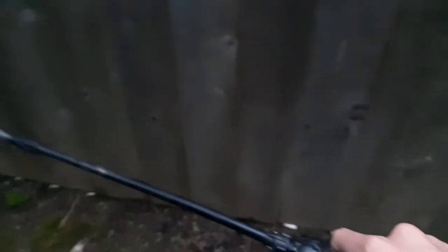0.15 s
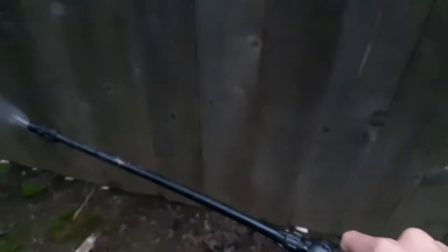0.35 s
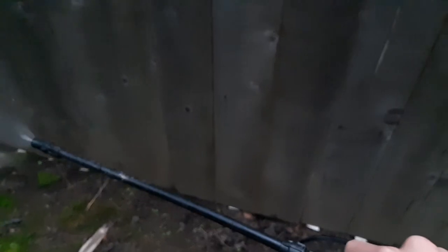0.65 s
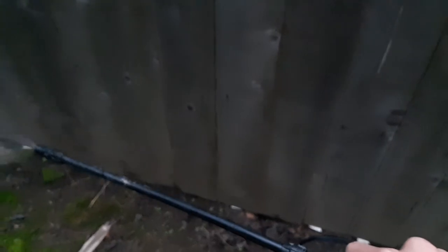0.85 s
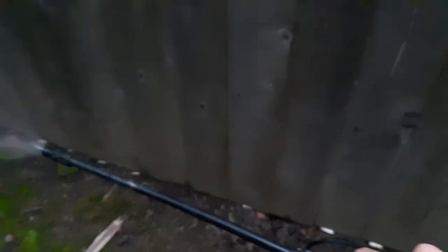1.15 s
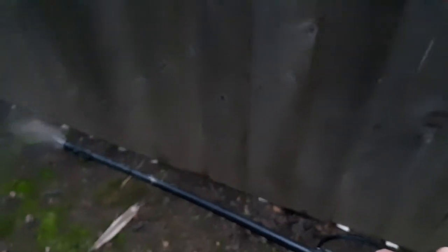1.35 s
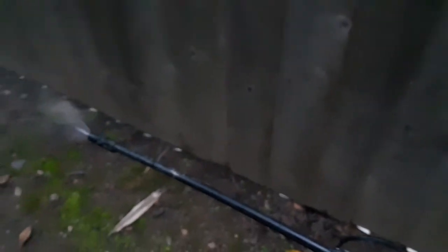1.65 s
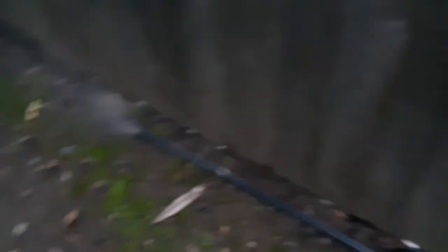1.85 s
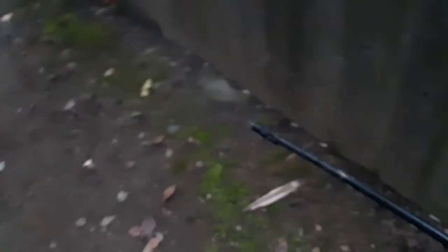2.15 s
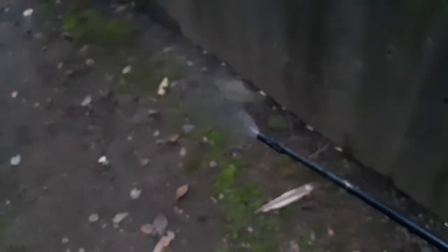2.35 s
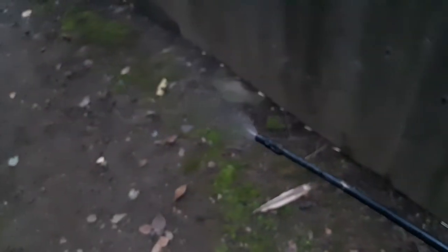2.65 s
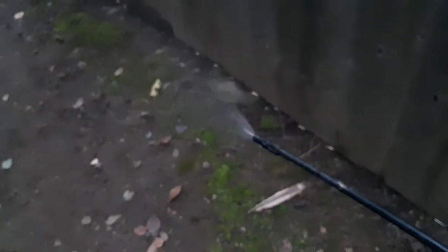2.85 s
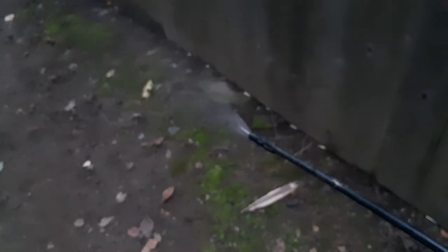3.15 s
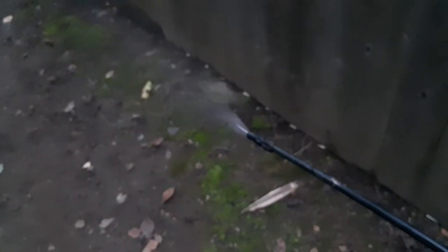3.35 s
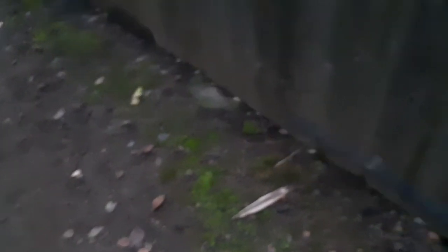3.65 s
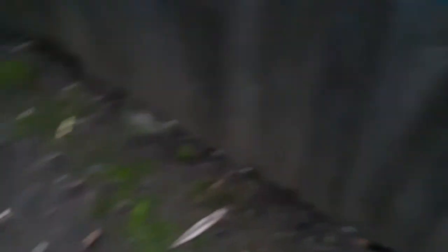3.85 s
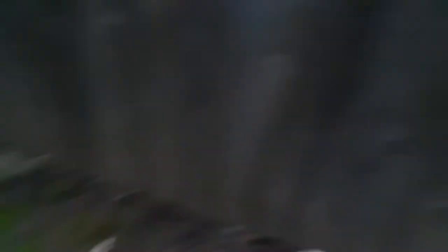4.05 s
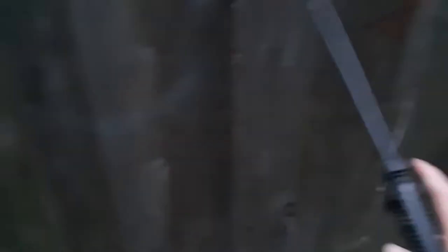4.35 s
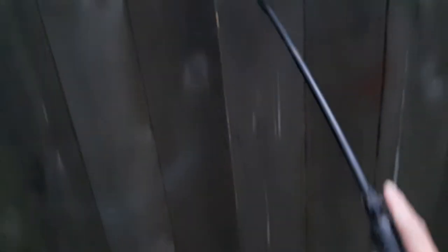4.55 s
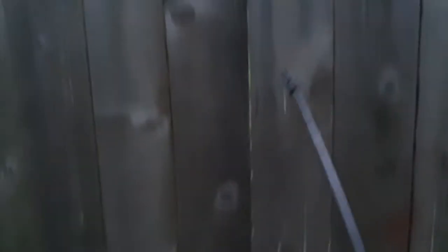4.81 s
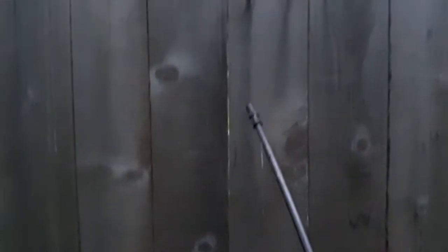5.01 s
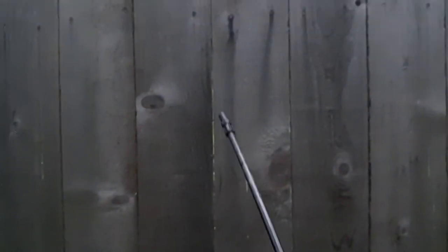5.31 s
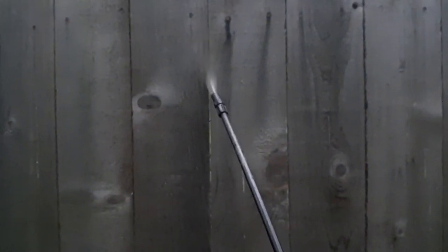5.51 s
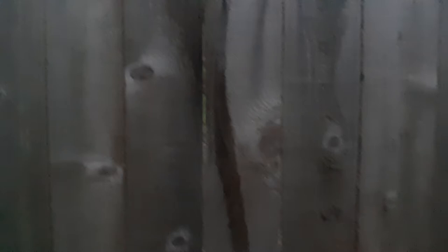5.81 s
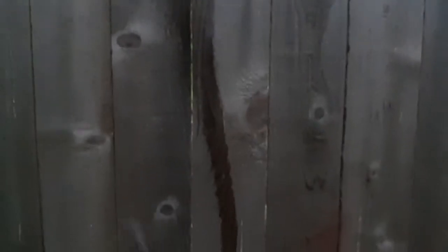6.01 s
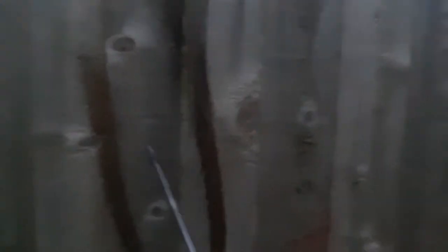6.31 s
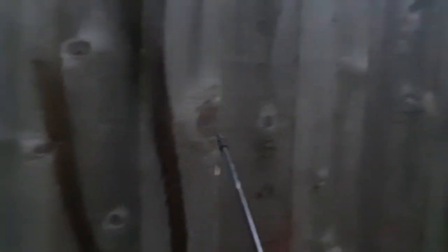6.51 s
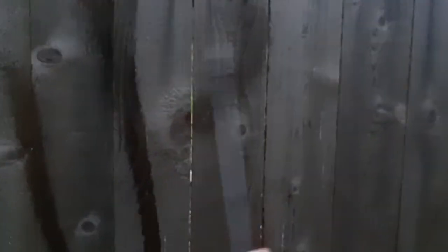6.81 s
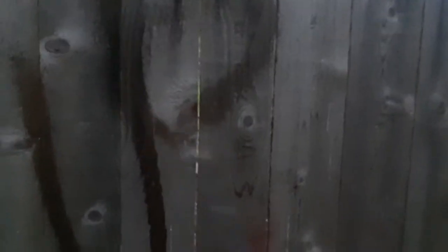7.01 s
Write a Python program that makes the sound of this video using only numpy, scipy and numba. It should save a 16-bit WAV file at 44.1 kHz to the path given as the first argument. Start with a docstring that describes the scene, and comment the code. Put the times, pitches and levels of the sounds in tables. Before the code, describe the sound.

A pump sprayer wand hisses a fine, soft mist close to the microphone, outdoors by a wooden fence, with a tiny break just after the start. From about 0.6 seconds it coughs loudly as the liquid runs low: puffs of air, fizzing froth and rapid sharp spits with a slightly hollow tube tone. The sputtering thins after 3 seconds and the hiss cuts off at 3.5. Between 4 and 4.9 seconds a sleeve rustles faintly and the plastic handle gives a few small knocks. From 5.3 to 6.1 seconds wind buffets the right side of the microphone with soft low thumps. The mist hisses again from 5.6 to 6.3 seconds, then from 6.6 until the end just after 7, opening with a few sharp spits. Distant traffic rumbles quietly throughout, and a bush cricket adds occasional faint, very high chirps on the left.

```python
"""Garden sprayer running dry

The wand of a pump sprayer hisses a fine mist at a wooden fence, then coughs air and froth as the liquid
runs low: jet noise, chopped by films of liquid and coloured by the tube. A bush cricket scrapes very high
chirps, traffic rumbles far off and wind buffets the right microphone. Between bursts of spray a sleeve
rustles and the plastic handle knocks."""
import sys
import numpy as np
from scipy import signal
from scipy.fft import rfft, irfft
from scipy.io import wavfile
from scipy.ndimage import uniform_filter1d, map_coordinates
from numba import njit

SR = 44100
rng = np.random.default_rng(int(sys.argv[2]) if len(sys.argv) > 2 else 0)


def log_audio(samples):
    """Write samples as a 16-bit WAV file to the path given in sys.argv[1]."""
    # one column per channel
    frames = np.atleast_2d(samples).T
    # limit to full scale, then quantise
    limited = np.clip(frames, -1, 1)
    pcm = np.round(limited * 32767).astype(np.int16)
    wavfile.write(sys.argv[1], SR, pcm)


N = 316197
TIME, FREQS = np.arange(N) / SR, np.fft.rfftfreq(N, 1 / SR)

# trigger pulls: (fully open [s], attack [s], shuts [s], release [s])
TRIGGER_PULLS = [(-.1, .01, .15, .065), (.208, .008, 3.52, .012), (5.575, .045, 6.235, .07),
                 (6.597, .008, 7.3, .01)]
# hiss of the mist while the trigger is open: (time [s], level [dB], treble [dB])
MIST_ENVELOPE = [(0, -56, 7.5), (.6, -55.5, 7), (1.8, -56, 11), (3.05, -53.5, 12), (3.3, -55, 5.5),
                 (3.52, -55.5, 6.5), (5.56, -54, 7), (5.7, -54, 2.5), (5.9, -50.5, 6.5), (6.05, -52.5, 9),
                 (6.22, -57.5, 13), (6.6, -46.5, 4), (6.75, -54.5, 11), (7.05, -53.5, 7.5),
                 (7.17, -47.5, -0.5)]
# tone of the liquid jet: (frequency [Hz], gain [dB])
MIST_EQ = [(290, -6.5), (500, -6), (680, -20), (799, -7.5), (1410, -3), (1610, -3.5), (1840, -4), (2430, 1),
           (3500, -0.5), (3990, 0), (6660, 0.5), (8540, -14), (10500, -10.5), (13600, -9), (15800, -15),
           (16500, -45)]
# tone of the air jet: (frequency [Hz], gain [dB])
AIR_EQ = [(350, -28.5), (650, -27), (850, -23.5), (1300, -14), (2050, -15), (2300, -9), (3100, -8),
          (3500, -8), (5800, -5), (6100, 0), (7050, -1.5), (7600, -10.5), (9000, -7.5), (12000, 0),
          (16500, -15)]
# air pockets: (start [s], length [s], start level [dB], end level [dB], 16 dB fall [s], treble [dB], bass
# [dB]); the first row is a brief tick as the trigger is pulled, the rest long pockets of air
AIR_POCKETS = [(.205, 0.0088, -48, -46, 0.0033, -6, 14), (0.635, 0.033, -24, -26.5, 0.0061, 0, 1),
               (0.73, 0.039, -24.5, -25, 0.044, -3, 0.5), (0.851, 0.064, -34.5, -27.5, 0.01, -1.5, 1),
               (1.138, 0.014, -41, -32, 0.014, -2, -6), (1.284, 0.014, -40, -29.5, 0.0075, -1, -5),
               (1.314, 0.012, -35, -32, 0.016, 2, -3), (1.412, 0.011, -35, -24.5, 0.0057, -2.5, -3),
               (1.591, 0.0097, -37, -28, 0.0063, -3, -1), (1.858, 0.037, -24.5, -23.5, .006, -0.5, -0.5),
               (1.965, 0.057, -24.5, -24, 0.032, -2, -0.5), (2.109, 0.028, -43, -42.5, 0.0092, -5, 4),
               (2.176, 0.013, -41, -29.5, 0.0027, -5, -0.5), (2.213, 0.013, -40.5, -28, 0.0028, 6.5, -2),
               (2.64, 0.0074, -37, -25.5, 0.0039, 0, -5), (2.719, 0.011, -39, -33.5, .005, 5, -4),
               (6.594, 0.023, -48, -37, .006, -15, -7)]
# froth, one list per coughing spell: (time [s], level [dB], treble [dB], bass [dB])
FROTH_SPELLS = [
    [(0.672, -40, 0.4, 2.8), (0.714, -43.5, 4, -6), (0.79, -27.5, 2, -2), (0.834, -41, -3, 8),
     (0.93, -44, 1.2, -1.5), (1.05, -44, 1, -1.5), (1.3, -39, -1, -4.5), (1.54, -40, -1, -2),
     (1.6, -37.5, -3, -9), (1.662, -48, 3, -3), (1.75, -57, -4.5, -19)],
    [(1.9, -35.5, -2, 6), (1.958, -42, -2, -13), (2.008, -27, -6, -16.5), (2.096, -42, -10, 2.5),
     (2.24, -42.5, 6, -0.2), (2.34, -47, 2.5, -0.7), (2.47, -41.5, -1.5, -2), (2.658, -35, 1.2, -2.5),
     (2.8, -43.5, 3, -2), (2.994, -55, 2, -6), (3.04, -87, -5, -3.5)],
    [(6.595, -60, -8, -3), (6.617, -48, 0.5, -6), (6.653, -57, 6.5, -5), (6.67, -52, 2.5, 4)],
]
# loudest short spits of air: (peak time [s], level [dB], 12 dB fall [ms])
AIR_SPITS = [(0.0303, -32, 3.5), (0.722, -44, 3.1), (0.688, -38, 3.76), (0.9484, -25.5, 2.3),
             (0.9697, -36, 6.7), (0.9853, -27.5, 2.5), (1.03, -37, 4), (1.0478, -23.5, 4),
             (1.0646, -35, 7.9), (1.0984, -27, 1.4), (1.1197, -29, 2.8), (1.1263, -26.5, 8.4),
             (1.1738, -30, 2.1), (1.1867, -29, 1.2), (1.211, -28, 7.5), (1.2364, -27, 1.7),
             (1.2651, -36, 6.1), (1.35, -25, 1.9), (1.358, -25, 1.5), (1.372, -28.5, 14), (1.453, -31, 3.4),
             (1.4657, -31.5, 17), (1.4865, -25.5, 2.7), (1.495, -29, 12), (1.518, -32, 2.3),
             (1.5292, -29, 3.3), (1.536, -24.5, 3.3), (1.5642, -28.5, 3.6), (1.5796, -34, 3.5),
             (1.6347, -36, 2.1), (1.656, -46, 3.1), (1.6785, -30, 1.7), (1.686, -32.5, 3.9),
             (1.7157, -40, 2.4), (1.7315, -33, 1.1), (1.9233, -37, 8.7), (2.0788, -44, 1.9),
             (2.1535, -31.5, 3.2), (2.257, -29, 1), (2.2662, -24.5, 2.7), (2.2773, -28.5, 13),
             (2.3221, -37, 4), (2.35, -34, 5.2), (2.3854, -27.5, 14.5), (2.4472, -27, 2.2),
             (2.463, -26, 9.1), (2.488, -27.5, 1.2), (2.522, -34, 1.5), (2.5338, -26.5, 2.3),
             (2.547, -25, 2), (2.576, -26.5, 4.6), (2.6068, -26.5, 1.8), (2.6606, -27.5, 17),
             (2.682, -27, 5.5), (2.705, -26, 9.5), (2.736, -31, 4.5), (2.757, -27.5, 2.1),
             (2.774, -26, 2.6), (2.782, -31.5, 6.9), (2.814, -39, 1.2), (2.8209, -27.5, 10),
             (2.839, -32.5, 8.7), (2.8756, -32.5, 7.8), (2.8968, -27.5, 1.3), (2.9088, -30.5, 2.4),
             (2.92, -31.5, 5.9), (2.9538, -35, 4.3), (2.963, -31, 1.5), (2.9945, -39.5, 3),
             (3.0449, -29, 11), (3.071, -34, 5.1), (3.0964, -34.5, 6.6), (3.1362, -36, 1.3),
             (3.173, -40.5, 8.4), (3.1956, -43, 1.1), (3.316, -43, 3.2), (3.443, -46, 1.1),
             (6.2273, -33.5, 5.9), (6.5922, -42, 1.2), (6.609, -34, 1.1), (6.6234, -22.5, 1.3),
             (6.6488, -26.5, 0.81), (6.6812, -33.5, 2.2), (6.7514, -37, 1.6), (6.798, -36.5, 1.1),
             (6.8145, -34, 1.9), (6.8487, -39.5, 1.1), (6.962, -43, 1.87)]
# lowest resonances of the emptied wand: (frequency [Hz], width [Hz], gain [dB])
WAND_MODES = [(430, 92, -12.5), (909, 170, -2.5), (1402, 150, -3)]
# the wand's place in the stereo image: (time [s], right lags left [ms], left minus right [dB])
WAND_PAN = [(0, .27, 1.5), (1.2, 0.25, 1), (1.75, 0.15, 2), (2.25, 0.039, -1), (2.7, -0.041, -1),
            (3.5, 0.022, 1.5), (5.5, -0.0634, -1), (6.2, 0.068, 0.5), (6.7, 0.035, -3), (7.17, 0.068, -3)]
# tone difference between the microphones: (frequency [Hz], left minus right [dB])
MIC_BALANCE = [(100, -0.5), (600, 0.5), (900, 2.5), (1400, 4), (2000, 11), (2500, 12), (3200, 7.5),
               (4300, 3.5), (6200, 6), (7500, 0.5), (9000, -0.5), (12000, -1), (15000, 4.5)]
# gusts on the microphone: (start [s], length [s], level [dB])
GUSTS = [(5.302, 0.083, -37.5), (5.558, 0.08, -41.5), (5.697, 0.017, -29.5), (5.747, .12, -36.5),
         (5.953, 0.073, -43.5)]
# tone of the buffeting: (frequency [Hz], gain [dB])
GUST_EQ = [(20, -34), (45, -14.5), (80, 0), (160, -4.5), (260, -15.5), (380, -24.5), (480, -29.5),
           (700, -68)]
# single eddies striking the right microphone: (time [s], peak [dB])
EDDIES = [(5.296, -24), (5.324, -35), (5.359, -24), (5.379, -35), (5.41, -37), (5.563, -31), (5.58, -30),
          (5.608, -31), (5.696, -36), (5.714, -35), (5.738, -35), (5.779, -45), (5.804, -24), (5.829, -27),
          (5.858, -31), (6.004, -31), (6.045, -29.5)]
# boom of an eddy: (frequency [Hz], width [Hz], gain [dB])
EDDY_MODES = [(107, 60, -2), (169, 190, -1)]
# cricket chirps: (start [s], length [s], level [dB])
CRICKET_CHIRPS = [(0.276, .035, -59), (.41, .045, -54), (3.403, .05, -54), (3.552, .03, -57.5),
                  (3.688, 0.082, -57.5), (3.99, .025, -59), (4.13, 0.057, -61.5), (4.297, 0.063, -61.5),
                  (4.548, 0.11, -59), (4.84, 0.048, -66), (4.984, 0.062, -64.5), (5.257, .045, -63),
                  (5.408, .035, -68), (5.535, .05, -59), (6.315, .06, -62), (6.475, 0.057, -64)]
# resonances of its wing: (frequency [Hz], width [Hz], gain [dB])
WING_MODES = [(12400, 990, -14), (14300, 1800, -2), (15100, 2000, -8.5)]
# small knocks of the handle: (start [s], length [s], hollow ring [dB], scrape [dB])
HANDLE_KNOCKS = [(4.024, 0.025, -88.5, -61.5), (4.492, .03, -65, -62), (4.627, .015, -63, -65.5),
                 (4.643, 0.028, -55, -56.5), (4.823, 0.0068, -51, -75.5)]
# handle resonances, three for the ring, then two for the scrape: (frequency [Hz], width [Hz], gain [dB])
HANDLE_MODES = [(510, 610, -7), (1160, 160, -2.5), (1514, 150, -5), (2630, 670, -13.5), (5100, 4400, -17.5)]
# tone of rubbing cloth: (frequency [Hz], gain [dB])
CLOTH_EQ = [(880, -52.5), (1500, -29), (2300, -4), (2500, -8.5), (3890, -1), (5490, -10.5), (6570, -3.5),
            (7690, -22.5), (9000, -36), (11700, -56), (19800, -120)]
# bed of far traffic and leaves: (time [s], rumble [dB], wash [dB])
BED_ENVELOPE = [(0, -60.5, -64.5), (1, -58, -58.5), (2, -55, -65), (3, -54, -61.5), (4, -56.5, -64),
                (4.6, -55.5, -60), (5.1, -59.5, -67), (5.4, -56, -60.5), (6.2, -60, -60), (6.4, -59, -65),
                (7.17, -62, -61.5)]
# tone of the bed's low rumble: (frequency [Hz], gain [dB])
RUMBLE_EQ = [(20, -30.5), (45, -19.5), (70, -2), (100, 0.5), (145, -8.5), (200, -15.5), (300, -17.5),
             (400, -21)]
# tone of the thin wash above it: (frequency [Hz], gain [dB])
WASH_EQ = [(300, -1), (450, -3), (580, -11), (780, -2.5), (850, -2), (950, -6.5), (1400, -13), (1950, -19),
           (2300, -12.5), (4000, -14.5), (7200, -13), (7900, -24), (11000, -24), (15500, -23)]


def nozzle(tube_hz=466, hollow_db=-20):
    """Mist and air as turbulent jets: the direct sound, and a separate splash off the fence per side."""
    mist_gain = mist()
    pocket_power = air_pockets()
    air_gain = np.sqrt(pocket_power + froth() + spits())
    # each puff circles in the wand's air column; slugs of liquid keep changing its length
    round_trip = np.clip(SR / tube_hz * (1 + 0.04 * wander(16)), 2, 500)
    sprays = []
    for _ in range(3):
        bass, middle, treble = jet(AIR_EQ) * air_gain
        cough = tube_feedback(bass, round_trip, feedback=0.33) + middle + treble
        hiss = (jet(MIST_EQ) * mist_gain).sum(axis=0)
        # long pockets ring the emptied wand
        hollow = unit(ring(noise(), WAND_MODES)) * np.sqrt(pocket_power[1])
        sprays.append(hiss + cough + hollow * undb(hollow_db + 3 * wander(40.05)))
    return sprays[0], np.array(sprays[1:])


def jet(eq):
    """Turbulent noise in bass, middle and treble bands, with the middle at rms 1."""
    spectrum = rfft(noise()) * undb(per_bin(eq))
    low = 1 / (1 + (FREQS / 2600) ** 6)
    high = 1 / (1 + (8300 / (FREQS + 1)) ** 10)
    bands = np.array([irfft(spectrum * band, N) for band in (low, 1 - low - high, high)])
    return bands / np.sqrt(np.mean(bands[1] ** 2))


def mist():
    """Liquid sprays evenly while the trigger is held: gain per jet band."""
    db, treble = curves(MIST_ENVELOPE)
    trigger = sum(held(opens, shuts, attack, release) for opens, attack, shuts, release in TRIGGER_PULLS)
    return trigger * undb(db + 0.27 * wander(30) + np.outer([0, 0, 1], treble))


def air_pockets():
    """Long pockets of air burst out, hold and die away, after one brief tick as the trigger is pulled: power
    per jet band."""
    power = np.zeros((3, N))
    for start, length, start_db, end_db, fall, treble, bass in AIR_POCKETS:
        t = TIME - start
        end = length + 4 * fall
        db = np.interp(t, [0, length, length + fall, end], [start_db, end_db, end_db - 16, end_db - 52.5])
        gate = np.clip(t / 0.003, 0, 1) * (t < end)
        power += np.outer(undb([bass, 0, treble]), undb(db) * gate) ** 2
    return power


def froth(fizz_per_s=72, fizz_db=4, fizz_fall_ms=2.2):
    """Films of liquid chop the flow and tiny random spits fizz on top: power per jet band."""
    flutter = undb(2 * wander(70) + 1.8 * wander(220)) ** 2
    pops = impulses(fizz_per_s) * rng.exponential(size=N) * undb(fizz_db) ** 2
    fizz = signal.lfilter([1], [1, -np.exp(-1000 / (fizz_fall_ms * SR))], pops)
    power = np.zeros((3, N))
    for spell in FROTH_SPELLS:
        db, treble, bass = curves(spell)
        power += spell_gate(spell) * (flutter + fizz) * undb([db + bass, db, db + treble]) ** 2
    return power


def spits(rise_ms=1.34, scatter_db=2, reference_db=-31.5):
    """Short, sharp puffs of air that take on the tone of the froth around them: power per jet band."""
    tone = np.outer([-4.5, 2], np.ones(N))  # bass and treble outside the spells [dB]
    for spell in FROTH_SPELLS:
        _, treble, bass = curves(spell)
        tone += spell_gate(spell) * (np.array([bass, treble]) - tone)
    offsets = np.arange(-(SR // 16), SR // 16)
    ms = 1000 * offsets / SR
    power = np.zeros((3, N))
    for time, db, fall_ms in AIR_SPITS:
        peak = int(time * SR)
        from_peak = np.where(ms < 0, -ms / rise_ms, ms / fall_ms)
        puff = undb(db - 12 * from_peak ** np.where(ms < 0, 2, 1.4))
        bass, treble = tone[:, peak] - scatter_db * rng.standard_normal(2)
        treble += 0.28 * (reference_db - db)  # weaker spits are brighter
        at = peak + offsets
        power[:, at[at >= 0]] += np.outer(undb([bass, 0, treble]), puff[at >= 0]) ** 2
    return power


def spell_gate(spell):
    """Soft-edged gate, open for one coughing spell."""
    return uniform_filter1d(1. * ((TIME > spell[0][0]) & (TIME < spell[-1][0])), size=200)


@njit
def tube_feedback(x, delay, feedback):
    """Pipe resonance: a comb filter whose delay, in samples, keeps moving."""
    y = np.sqrt(1 - feedback ** 2) * x
    for i in range(512, len(x)):
        whole = int(delay[i])
        part = delay[i] - whole
        y[i] += feedback * ((1 - part) * y[i - whole] + part * y[i - whole - 1])
    return y


def place_spray(direct, splash, splash_db=-8, echo_db=-6):
    """Pans the moving wand by delay and level, with splash and reflections mixed in."""
    lag_ms, pan_db = curves(WAND_PAN)
    right = map_coordinates(direct, [np.arange(N) - lag_ms * SR / 1000], order=3, mode="nearest")
    mix = np.array([direct, right]) + undb(splash_db) * splash + undb(echo_db) * reflections(direct)
    mix /= np.sqrt(1 + undb(2 * splash_db) + undb(2 * echo_db))
    return mic_tone(*(mix * undb([pan_db / 2, -pan_db / 2])))


def reflections(source, t60=0.035, hop_s=0.352):
    """Short echoes off fence and ground; random paths crossfade as the wand moves."""
    hop = int(hop_s * SR)
    t = np.arange(SR // 16) / SR
    out = np.zeros((2, N + 3 * hop + len(t)))
    padded = np.pad(source, (hop, 2 * hop))
    for i in range(0, N + hop, hop):
        paths = rng.standard_normal((2, len(t))) * undb(-60 * t / t60) * (t > .0005)
        paths /= np.sqrt(np.sum(paths ** 2, axis=1, keepdims=True))
        piece = padded[i:i + 2 * hop] * np.sqrt(np.hanning(2 * hop))[:len(padded) - i]
        out[:, i:i + len(piece) + len(t) - 1] += signal.fftconvolve(piece[None], paths, axes=1)
    return out[:, hop:hop + N]


def wind(attack=0.022, release=0.034, breeze_db=-48.5, eddy_ms=10.3):
    """Gusts rumble and eddies thud on the right microphone; a little rumble reaches the left."""
    breeze = undb(breeze_db) * held(5.4, 6.07, attack, release)
    gusts = sum(undb(db) * held(start, start + length, attack, release) ** 2 for start, length, db in GUSTS)
    out = np.array([unit(equalise(noise(), per_bin(GUST_EQ))) for _ in range(2)])
    out *= undb(2 * wander(35) + np.array([[-16], [1]])) * (breeze + gusts)
    n = int(SR * eddy_ms / 1000)
    push_pull = np.sin(np.linspace(0, 2 * np.pi, n)) * np.hanning(n)
    thud = ring(np.pad(push_pull, (0, SR // 10)), EDDY_MODES)
    thud /= np.abs(thud).max()
    for time, peak_db in EDDIES:
        i = int(time * SR)
        out[1, i:i + len(thud)] += np.sign(rng.standard_normal()) * undb(peak_db) * thud
    return out


def cricket(teeth_per_s=900, ticks_per_s=9):
    """A wing file scraped in fast, uneven teeth, off to the left; faint single ticks in between."""
    teeth = impulses(teeth_per_s, (2, N)) * undb(1.58 * rng.standard_normal((2, N)))
    gate = sum(undb(db) * np.interp(TIME - start, [0, .006, length, length + .013], [.008, 1, .62, .0046])
               for start, length, db in CRICKET_CHIRPS)
    left = unit(ring(teeth[0] + 0.054 * noise(), WING_MODES)) * gate
    right = unit(ring(teeth[1], WING_MODES)) * gate
    ticks = ring(impulses(ticks_per_s) * undb(2.8 * noise() - 30), WING_MODES)
    return np.array([undb(3) * left + ticks, undb(-8.5) * right + .5 * ticks])


def handle():
    """Short scuffs ring the plastic handle: a hollow knock with a scrape on top."""
    hollow = unit(ring(noise(), HANDLE_MODES[:3]))
    scrape = unit(ring(noise(), HANDLE_MODES[3:]))
    knocks = np.zeros(N)
    for start, length, hollow_db, scrape_db in HANDLE_KNOCKS:
        gate = np.interp(TIME - start, [0, .002, length, length + 0.0063], [0, 0.93, 0.71, 0.005])
        knocks += gate * (undb(hollow_db) * hollow + undb(scrape_db) * scrape)
    return np.outer(undb([1, -1]), knocks)


def sleeve(start=4.17, peak=4.38, end=4.82, peak_db=-54.5, edge_db=-67):
    """Cloth slides on cloth in one swell as the arm lifts the wand."""
    swell_db = np.interp(TIME, [start, peak, end], [edge_db, peak_db, edge_db])
    rub = unit(equalise(noise(), per_bin(CLOTH_EQ))) * undb(swell_db + wander(24.74))
    rub *= held(start, end, attack=.05, release=.055)
    return mic_tone(np.roll(rub, shift=4), rub)  # reaches the right side first


def traffic_and_leaves():
    """A low, nearly mono rumble and a thin, wide wash, each swelling on its own."""
    freqs = FREQS + 1
    mid, side = rfft(noise()), rfft(noise())
    width = np.clip(freqs / 800, .1, 1)
    left_right = np.array([[1], [-1]])
    stereo = (mid + left_right * width * side) / np.sqrt(1 + width ** 2)
    stereo *= undb(left_right * per_bin(MIC_BALANCE) / 2)
    below_wash = freqs < WASH_EQ[0][0]
    rumble = unit(irfft(stereo * below_wash * undb(per_bin(RUMBLE_EQ)), N))
    wash = unit(irfft(stereo * ~below_wash * undb(per_bin(WASH_EQ)), N))
    rumble_db, wash_db = curves(BED_ENVELOPE)
    return rumble * undb(rumble_db + 1.1 * wander(7.4)) + wash * undb(wash_db + 1.1 * wander(1.827))


def mic_tone(left, right):
    """Gives each microphone its own colour."""
    half_db = per_bin(MIC_BALANCE) / 2
    return np.array([equalise(left, half_db), equalise(right, -half_db)])


def undb(db):
    """Decibels to gain."""
    return 10 ** (np.asarray(db) / 20)


def unit(x):
    """Scales to rms 1."""
    return x / np.sqrt(np.mean(x ** 2))


def noise():
    """White noise."""
    return rng.standard_normal(N)


def impulses(per_s, size=N):
    """Randomly timed clicks."""
    return rng.random(size) < per_s / SR


def curves(table):
    """A timed table's columns as automation curves."""
    times, *columns = np.transpose(table)
    return [np.interp(TIME, times, column) for column in columns]


def per_bin(table):
    """An EQ table read at every frequency bin."""
    hz, db = np.transpose(table)
    return np.interp(np.log(FREQS + 1), np.log(hz), db)


def equalise(x, db):
    """Applies one gain per frequency bin."""
    return irfft(rfft(x) * undb(db), N)


def wander(rate):
    """Smooth random modulation of rms 1, with rate new values a second."""
    hold = int(SR / rate)
    steps = np.repeat(rng.standard_normal(N // hold + 1), hold)
    return unit(uniform_filter1d(uniform_filter1d(steps, hold), hold)[:N])


def ring(x, modes):
    """Parallel resonators, each applied twice for steep flanks."""
    out = 0
    for hz, width, db in modes:
        b, a = signal.iirpeak(hz, hz / width, SR)
        out = out + undb(db) * signal.lfilter(b, a, signal.lfilter(b, a, x))
    return out


def held(start, end, attack, release):
    """Gate fully open from start to end, with its ramps outside that span."""
    return np.clip((TIME - start) / attack + 1, 0, 1) * np.clip((end - TIME) / release + 1, 0, 1)


def scene():
    """The sprayer up front, the garden around it."""
    return place_spray(*nozzle()) + cricket() + wind() + handle() + sleeve() + traffic_and_leaves()


def record(dry, fade_hz=15800, cut_hz=16900):
    """Two low-passes fade the very top, then cut it."""
    soft = signal.sosfilt(signal.ellip(6, .2, 28, fade_hz, fs=SR, output="sos"), dry)
    return signal.sosfilt(signal.ellip(10, .2, 70, cut_hz, fs=SR, output="sos"), soft)


dry = scene()
out = record(dry)
log_audio(out)
```